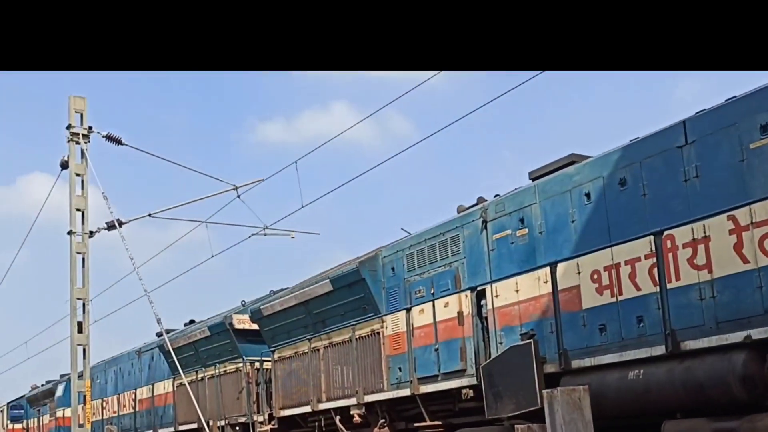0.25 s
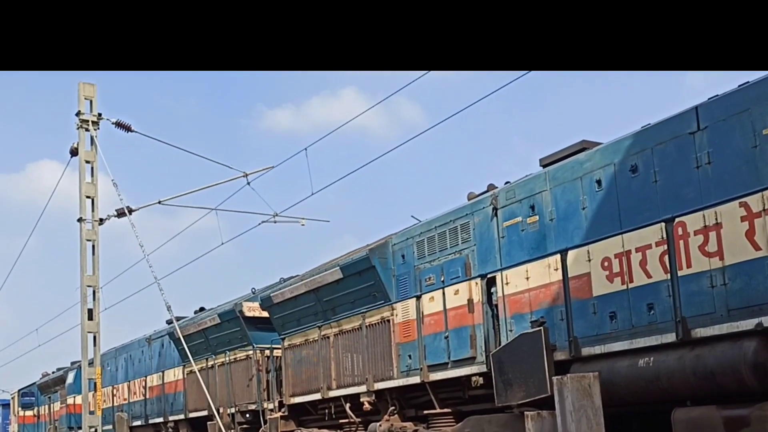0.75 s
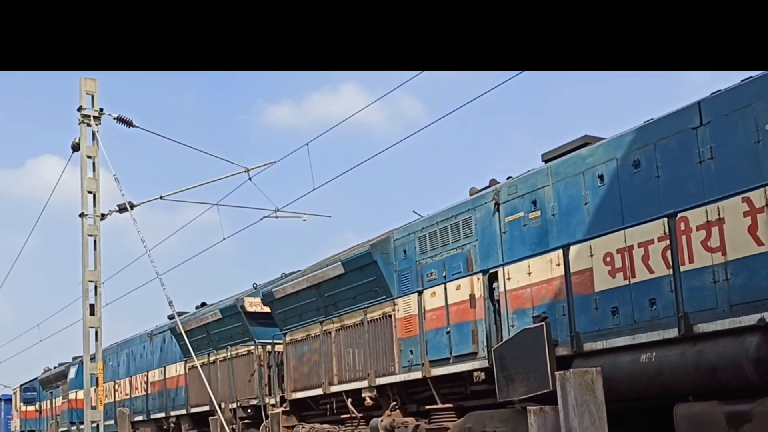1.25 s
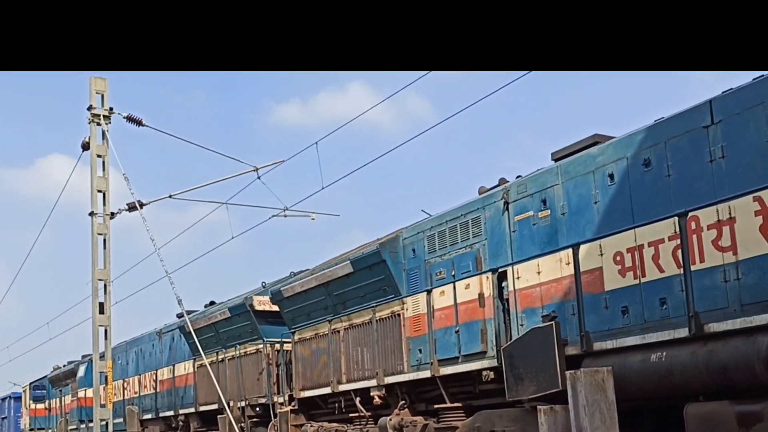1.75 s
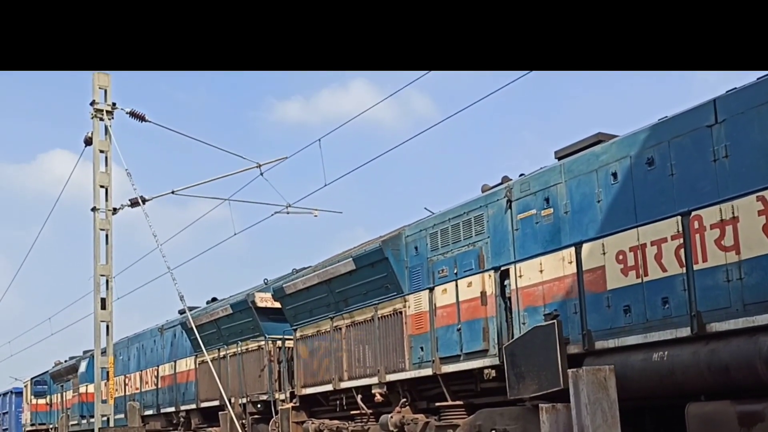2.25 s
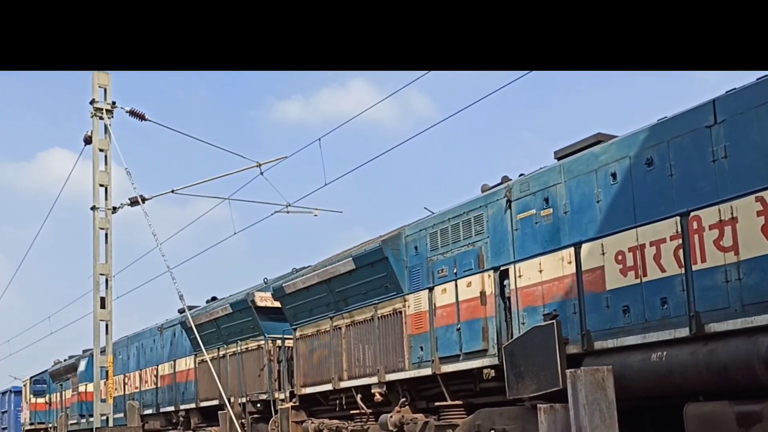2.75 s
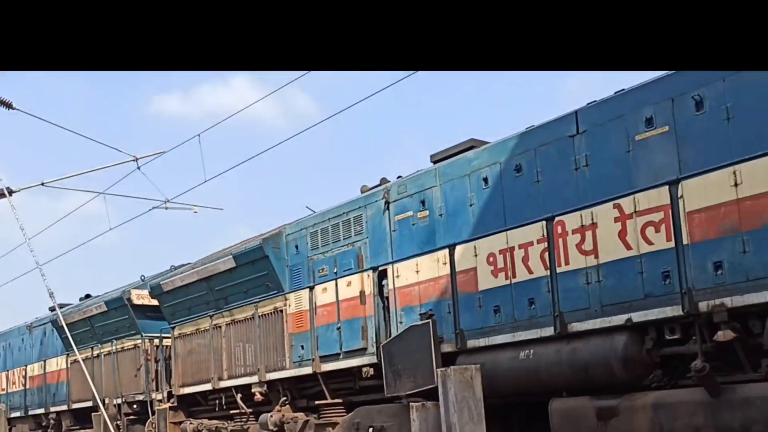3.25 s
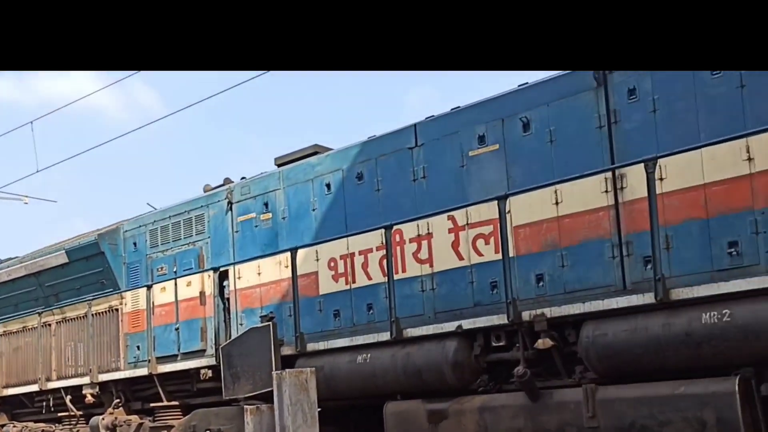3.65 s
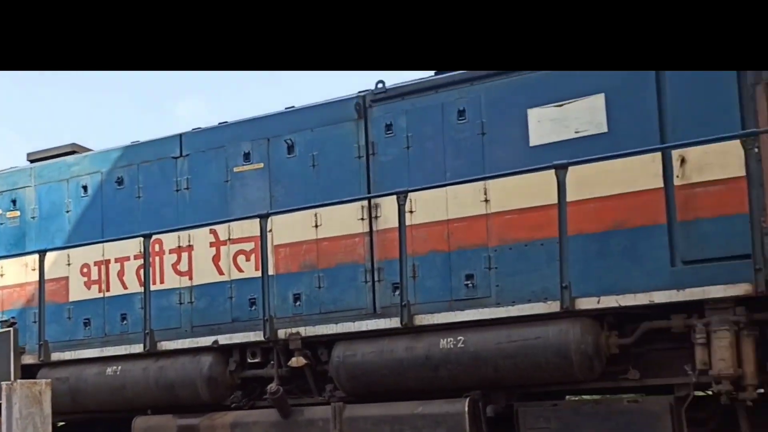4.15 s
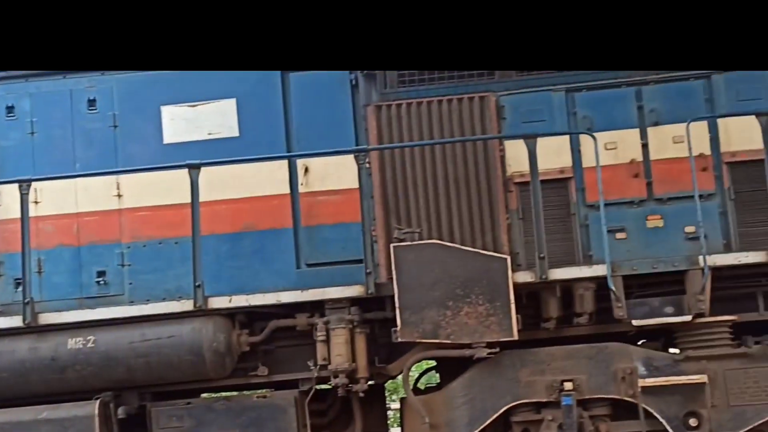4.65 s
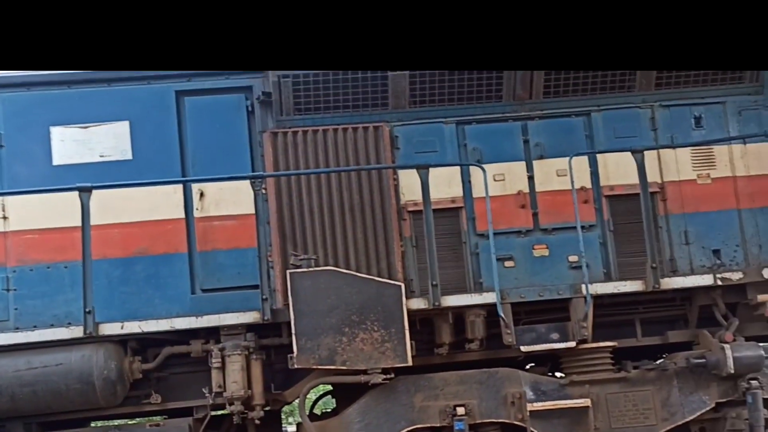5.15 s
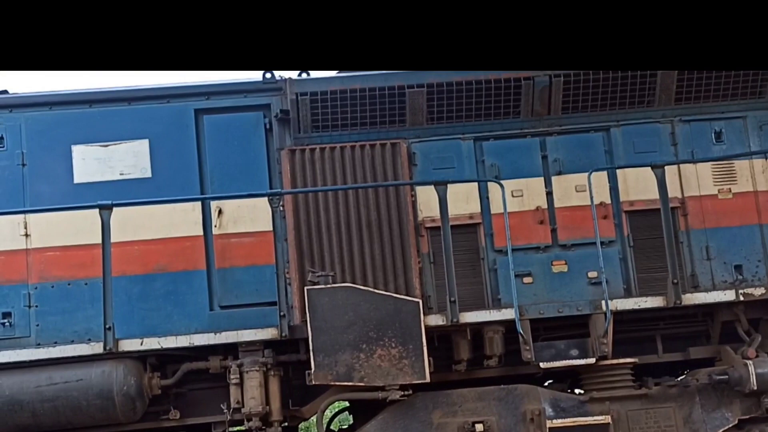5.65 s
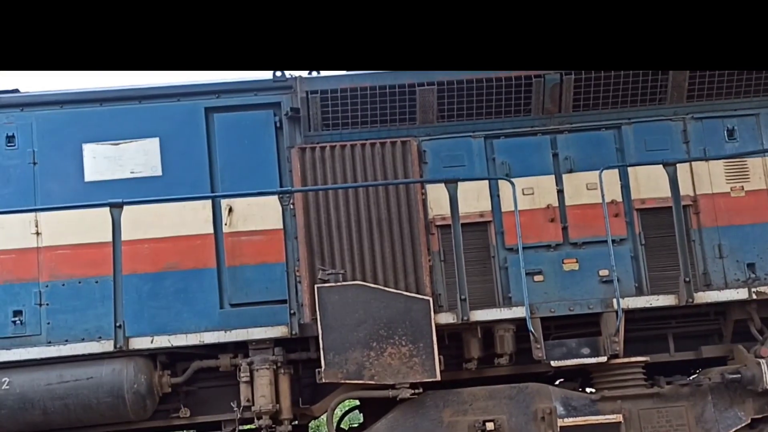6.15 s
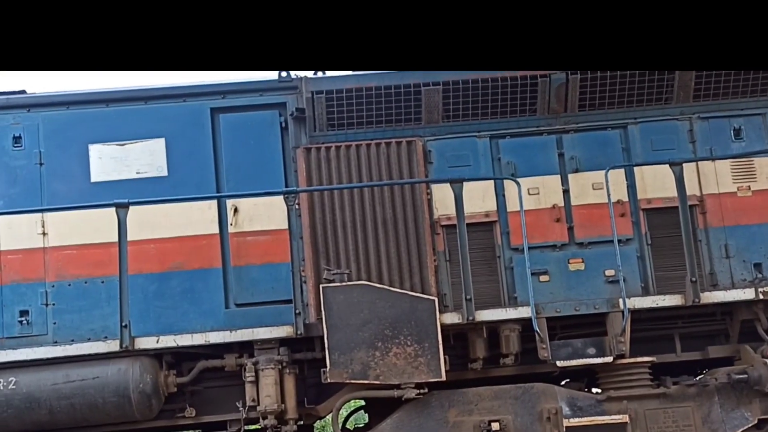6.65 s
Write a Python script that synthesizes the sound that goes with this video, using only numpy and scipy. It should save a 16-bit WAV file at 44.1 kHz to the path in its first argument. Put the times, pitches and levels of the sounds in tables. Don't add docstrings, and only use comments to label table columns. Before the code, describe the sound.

Close outdoor capture of a large idling diesel locomotive: fast, uneven low exhaust throbs, broad engine-room roar, humming casing and a thin steady turbocharger whine. After two seconds an air valve spits twice, then blasts with a hollow pipe-like whoosh, briefly ducking the engine. A sharp click follows. As the microphone turns towards the engine side, the middle tones come forward; a short hissing leak arrives near the end.

```python
import sys
import numpy as np
from scipy import signal
from scipy.fft import rfft, irfft, next_fast_len
from scipy.io import wavfile
from scipy.ndimage import uniform_filter1d, minimum_filter1d

SR = 44100
rng = np.random.default_rng(int(sys.argv[2]) if len(sys.argv) > 2 else 0)


def gain_from_decibels(decibels):
    exponent = np.asarray(decibels, float) / 20
    return 10 ** exponent


def output_pcm(signal):
    pcm = np.clip(np.atleast_2d(signal).T, -1, 1) * 32767
    wavfile.write(sys.argv[1], SR, np.round(pcm).astype(np.int16))


N = 303496
T = np.arange(N) / SR

CRANK_HZ = 4.5066
# (strength [dB], lag along the manifold [ms])
CYLINDERS = [(-40.0, -2.37), (-44.1, -3.71), (-38.0, -3.85), (-36.5, 3.93), (-34.4, -3.97), (-37.9, 3.68),
             (-36.5, -2.49), (-39.4, 4.34), (-37.9, 1.3), (-42.5, -0.2), (-40.6, -0.79), (-44.7, -3.59),
             (-41.6, 0.5), (-37.6, -1.68), (-51.3, 5.89), (-39.5, -0.82)]
# (multiple of crank speed, level [dB rms], change once the listener has turned [dB])
CASING_HUM = [(33, -38.7, 0), (40, -36.0, 0), (43, -35.2, 0), (48, -38.7, 0), (49, -35.8, 0),
              (52, -38.7, 0), (58, -38.7, 0), (60, -35.7, 0), (79, -35.9, 0), (80, -38.7, 0),
              (88, -36.1, -2), (90, -38.6, 0), (91, -39.4, 0), (92, -37.4, 0), (94, -33.6, -3),
              (96, -34.2, -11), (97, -39.5, 0), (112, -39.4, 0), (113, -37.8, 0), (146, -35.8, -6),
              (147, -40.3, 0), (156, -42.2, 4), (157, -40.7, 4), (158, -33.7, 3.5)]
FAINT_HUM = [50, 51, 54, 59, 61, 62, 71, 75, 76, 77, 78, 82, 100, 102, 114, 127, 143, 150, 155, 159, 163,
             169]
FAINT_HUM_DB = -44.5
# (frequency [Hz], density [dB per Hz])
ROAR_SPECTRUM = [(40, -34.5), (58, -23), (80, -1.5), (130, -1), (220, -0.5), (300, -2), (420, -1),
                 (700, -2.5), (850, -11.5), (1250, -17.5), (2000, -15), (2400, -18), (3200, -22),
                 (4400, -22)]
# (time [s], share turned, roar level [dB])
FACING = [(0, 0.05, -18.5), (1.5, 0.01, -19), (2.6, 0.02, -18.5), (3.3, 0.31, -19.5), (4, 0.55, -19.5),
          (4.8, 0.75, -20.5), (5.6, 0.86, -20.5), (6.3, 0.78, -20), (6.88, 1.2, -22.5)]
# (time [s], frequency [Hz], level [dB])
TURBO = [(0, 3985, -24.5), (1.2, 3985.5, -24.5), (2.3, 3987, -25.5), (3.2, 3986, -26), (3.75, 3985, -30),
         (4.4, 3984, -27.5), (5.1, 3990, -25), (6.1, 3989, -28), (6.6, 3989, -25), (6.88, 3989, -26)]
# (multiple, level [dB], blur width [Hz])
TURBO_OVERTONES = [(2, -21.5, 55), (3, -18, 70)]
# (delay [s], level [dB])
TURBO_ECHOES = [(.02, -5), (.045, -7), (.075, -9)]
# (time [s], level [dB])
LOW_GEAR = [(0, -36.5), (.5, -33.5), (1.4, -32.5), (2.5, -33), (3.7, -35), (4.5, -32.5), (4.9, -32.5),
            (5.4, -46), (5.8, -40), (6.7, -41), (6.88, -55)]
# (time [s], level [dB])
HIGH_GEAR = [(0, -52), (.44, -42), (.9, -51.5), (1.3, -51), (2.1, -53), (2.5, -41), (3.1, -39), (3.7, -49),
             (4.7, -38.5), (5.18, -46), (5.5, -40), (6.2, -56), (6.88, -46.5)]
LOOSE_HZ = [700, 995, 2117, 2162, 2188, 4980, 5110, 5437, 5884, 6799]
# (width [Hz], level [dB])
LOOSE_TONES = [(40, -38.5), (19, -46), (20, -43.5), (40, -41.5), (26, -41), (8, -57), (10, -62.5), (6, -49),
               (8, -56), (20, -53)]
# (frequency [Hz], density [dB per Hz])
JET_SPECTRUM = [(1500, -11), (2500, -2), (3500, -0.5), (4500, 0.5), (7000, -3), (10000, 3), (13000, -1.5),
                (16000, -4.5)]
# (frequency [Hz], width [Hz], level [dB])
VALVE_CAVITY = [(3000, 78, -2.5), (3600, 220, 1), (4320, 500, -12), (6590, 600, 1), (7480, 250, 1.5),
                (12200, 1000, 1.5)]
# (time [s], level [dB], sag [dB per s], open time [s])
SPITS = [
    (1.994, -33, 120, .08),
    (2.22, -31.5, 105, .09),
]
# (frequency [Hz], gain [dB])
SPIT_COLOUR = [(4000, -18), (5600, 0), (7500, -2), (9000, -4), (13000, -3)]
# (time [s], level [dB], sag [dB per s], open time [s])
PUFFS = [
    (2.64, -27, 11, 0.134),
    (2.692, -22, 300, 0.094),
    (2.776, -22, 58, 0.33),
]
# (time [s], peak level [dB], frequency [Hz], t60 [s])
TICKS = [
    (2.305, -35, 15300, .03),
    (2.36, -49, 15400, 0.024),
    (3.516, -25, 13600, .003),
    (3.5195, -31, 13500, .003),
    (5.92, -43, 13200, 0.017),
    (6.36, -44, 13100, .02),
    (6.445, -40, 13100, 0.033),
    (6.82, -43, 13500, .01),
]
# (time [s], level [dB])
PIPE_FLOW = [(2.7, -49), (2.738, -26.5), (2.79, -31), (2.9, -28), (3.0, -33), (3.07, -33.5), (3.15, -38),
             (3.3, -45)]
# (frequency [Hz], width [Hz], level [dB])
PIPE_MODES = [(1350, 22, -4), (1536, 18, -4), (1700, 25, -3), (1773, 30, 0), (1880, 36, -2), (2013, 27, -2),
              (2390, 45, -3), (2870, 140, -8), (4215, 60, -3)]
# (middle [s], length [s], frequency [Hz], level [dB])
TOOTS = [(2.76, .12, 798, -25), (2.95, .12, 800, -26), (3.08, .16, 806, -29), (2.85, .24, 977, -28),
         (3.02, .1, 975, -34), (2.77, .13, 1165, -30), (2.94, .2, 1172, -35), (2.86, .1, 1026, -36),
         (3.02, .2, 1026, -32), (3.23, .2, 1024, -35), (3.42, .22, 1030, -38)]
# (time [s], level [dB], sag [dB per s], open time [s])
LEAKS = [
    (6.3, -48, -22, 0.27),
    (6.554, -25.5, 22, .13),
    (6.69, -33, 40, .2),
    (6.742, -39, 56, 0.4),
]
# (frequency [Hz], width [Hz], level [dB])
SQUEAL_MODES = [(3000, 90, -9), (3600, 120, -7), (5600, 150, -4), (6470, 150, 0), (7500, 80, 1),
                (8300, 200, -4), (8800, 150, 0), (13100, 500, 0), (14200, 120, -2), (14600, 120, -3)]
STEP_HZ = [4720, 4790, 6070, 6140, 7560, 7660, 7730, 8470, 8580, 10300, 10900, 11480, 11640, 12800, 15720,
           15860]
STEP_DB = [0.5, -9.5, -7.5, -1, -2, 1.5, -6, -7.5, -22, -35.5, -41, -48.5, -21.5, -21.5, -22, -62.5]


def evened(x):
    return x / np.sqrt(np.mean(abs(x) ** 2) + 1e-20)


def read(points, hz):
    f, value = np.transpose(points)
    return np.interp(np.log(hz + 1), np.log(f + 1), value)


def level(rows):
    s, db = np.transpose(rows)
    return gain_from_decibels(np.interp(T, s, db, left=-120, right=-120))


def coloured(x, points):
    size = next_fast_len(N)
    gain = gain_from_decibels(read(points, np.fft.rfftfreq(size, 1 / SR)))
    return irfft(rfft(x, size) * gain, size)[:N]


def white():
    return rng.standard_normal(N)


def wobble(width_hz):
    r = np.exp(-np.pi * width_hz * 10 / SR)
    z = [1, 1j] @ rng.standard_normal((2, N // 10 + 2))
    for _ in range(2):
        z = signal.lfilter([1], [1, -r], z)
    return np.interp(np.arange(N) / 10, np.arange(len(z)), evened(z))


def tone(hz):
    turns = (np.cumsum(hz * np.ones(N)) / SR + rng.random()) % 1
    angle = (2 * np.pi * turns).astype(np.float32)
    return np.sqrt(2) * (np.cos(angle) + 1j * np.sin(angle))


def crank_swing(share, multiple=1):
    return np.cos(2 * np.pi * (multiple * CRANK_HZ * T - share))


def share_turned():
    return np.interp(T, *np.transpose(FACING)[:2])


def modes(table):
    return evened(sum(gain_from_decibels(db) * np.sqrt(w) * (tone(hz) * wobble(w)).real for hz, w, db in table))


def puffs(rows):
    open_s, shut_s = 0.011, 0.02
    gain = 0
    for s, db, sag, length in rows:
        opening = np.clip(1 + (T - s) / open_s, 0, 1) ** 2
        shutting = np.clip(1 + (s + length - T) / shut_s, 0, 1) ** 2
        gain = gain + gain_from_decibels(db - sag * np.maximum(T - s, 0)) * opening * shutting
    return gain


def exhaust():
    pulses = np.zeros(N + SR)
    turns = np.arange(int(N / SR * CRANK_HZ) + 3)
    for k, (db, lag_ms) in enumerate(CYLINDERS):
        s = (turns + k / len(CYLINDERS)) / CRANK_HZ + lag_ms / 1000
        at = np.round((s + 0.5 - 2 / CRANK_HZ) * SR).astype(int)
        pulses[at[at < len(pulses)]] += gain_from_decibels(db) * SR / (2 * CRANK_HZ)
    silencer = np.vstack([signal.butter(4, 70, "high", fs=SR, output="sos"),
                          signal.butter(4, 108, "low", fs=SR, output="sos")])
    edges = [(47, -35), (54, 5), (59, -12), (68, 0), (137, 0), (142, -25)]
    return coloured(signal.sosfilt(silencer, pulses)[SR // 2:][:N], edges)


def casing():
    turned = share_turned() - 0.25
    hum = 0
    for k, db, change in CASING_HUM + [(k, FAINT_HUM_DB, 0) for k in FAINT_HUM]:
        swell = 0.88 + 0.38 * wobble(0.32)
        hum = hum + gain_from_decibels(db + turned * change) * (tone(k * CRANK_HZ) * swell).real
    return hum


def roar():
    size, hop = 1024, 256
    frames, hz = N // hop + 5, np.fft.rfftfreq(size, 1 / SR)
    a, b, patches = rng.standard_normal((frames, size // 2 + 1, 3)).T
    patches = evened(uniform_filter1d(uniform_filter1d(patches, 14, 0), 10, 1))
    s, turned, db = np.transpose(FACING)
    t = np.arange(frames) * hop / SR

    def turning(before_db, after_db):
        return np.interp(t, s, before_db + (after_db - before_db) * turned)

    mid = read([(700, 0), (900, 1), (1500, 1), (1900, 0)], hz)[:, None]
    top = read([(1900, 0.073), (2400, 0.94), (5000, 2.0), (8000, 0.29)], hz)[:, None]
    fizz = read([(12850, 0), (12950, 1)], hz)[:, None]
    field_db = read(ROAR_SPECTRUM, hz)[:, None] + 0.93 * patches
    field_db += mid * turning(0.5, 6.5) + top * turning(-1.25, 1)
    field_db += fizz * (turning(1.5, -0.8) + 1.2 * rng.standard_normal(frames))
    noise = signal.istft((a + 1j * b) * gain_from_decibels(field_db), nperseg=size, noverlap=size - hop)[1][:N]
    return gain_from_decibels(np.interp(T, s, db)) * coloured(evened(noise), [(40, -8), (52, -14), (68, 0)])


def turbo():
    s, hz, db = np.transpose(TURBO)
    swing_hz, fastest_share = 10.5, 0.15

    def heard(delay_s):
        return np.interp(T, s, hz) + swing_hz * crank_swing(fastest_share + CRANK_HZ * delay_s)

    blades = tone(heard(0)) * (0.75 + 0.4 * wobble(17)) * (1 + 0.4 * crank_swing(0.8, 3))
    for delay_s, echo_db in TURBO_ECHOES:
        blades = blades + gain_from_decibels(echo_db) * tone(heard(delay_s)) * wobble(1.57)
    blades = blades / np.sqrt(uniform_filter1d(abs(blades) ** 2, size=13000) / 2)
    overtones = sum(gain_from_decibels(-16.5 + over_db) * tone(k * heard(0)) * (0.3 + wobble(w))
                    for k, over_db, w in TURBO_OVERTONES)
    skirt = tone(heard(0)) * wobble(100)
    return (gain_from_decibels(np.interp(T, s, db) + 0.55) * blades + gain_from_decibels(-31.0) * skirt + overtones).real


def gear(rows, hz, swing_hz, fastest_share, depth_db, crest_share, blur):
    s, db = np.transpose(rows)
    pitch = hz + swing_hz * crank_swing(fastest_share)
    swell = gain_from_decibels(depth_db * (np.tanh(2 * crank_swing(crest_share)) - 0.53))
    return gain_from_decibels(np.interp(T, s, db) + 3.0) * (tone(pitch) * swell * (1 + blur * wobble(11))).real


def gears():
    low = gear(LOW_GEAR, 2558.9, 10.5, 0.96, 4.8, 0.45, 0.28)
    high = gear(HIGH_GEAR, 4326, 6, 0.95, 6.5, 0.84, 0.5)
    loose = sum(gain_from_decibels(db) * (tone(hz) * wobble(w)).real for hz, (w, db) in zip(LOOSE_HZ, LOOSE_TONES))
    side = gain_from_decibels(-35.5) * tone(705) * wobble(40) + gain_from_decibels(-52) * tone(5625) * wobble(9)
    side = side + gain_from_decibels(-44) * tone(2562) * (0.7 + 0.5 * wobble(14))
    throb = 1 + 0.8 * crank_swing(0.87)
    rattle = throb * sum(tone(hz) * wobble(18) for hz in (4345, 4370)).real
    return low + high + gain_from_decibels(-46.5) * rattle + loose + share_turned() * side.real


def valve_jet(sputter):
    jet = evened(coloured(white(), JET_SPECTRUM)) + 0.5 * modes(VALVE_CAVITY)
    return sputter * gain_from_decibels(9.0) * (jet * puffs(PUFFS) + coloured(jet, SPIT_COLOUR) * puffs(SPITS))


def ticks():
    out, t = np.zeros(N), np.arange(1500) / SR
    for s, db, hz, t60 in TICKS:
        attack = np.minimum(t / (t60 / 10), 1)
        out[round(s * SR):][:len(t)] += gain_from_decibels(db + 25 - 60 * t / t60) * np.sin(2 * np.pi * hz * t) * attack
    return out


def drain_pipe(sputter):
    rush_spectrum = [(700, -20), (900, -8), (1800, 8), (3000, 1.5), (4600, 0.5), (6000, -19)]
    rush = evened(coloured(white(), rush_spectrum))
    toots = sum(gain_from_decibels(db) * np.exp(-8 * ((T - s) / length) ** 2) * tone(hz) for s, length, hz, db in TOOTS)
    toots = (toots * (1.0 + 0.55 * wobble(60))).real
    return level(PIPE_FLOW) * (gain_from_decibels(3.0) * modes(PIPE_MODES) + gain_from_decibels(2.5) * sputter * rush) + toots


def leak():
    hiss = evened(coloured(white(), JET_SPECTRUM))
    return gain_from_decibels(-2.0) * puffs(LEAKS) * (gain_from_decibels(3) * hiss + gain_from_decibels(1) * modes(SQUEAL_MODES))


def air():
    sputter = gain_from_decibels(1.8 * wobble(130).real)
    return valve_jet(sputter) + drain_pipe(sputter) + leak()


def scene():
    middle_s, width_s, depth_db = 2.827, 0.09, -7.5
    duck = gain_from_decibels(depth_db * np.exp(-((T - middle_s) / width_s) ** 2))
    machinery = duck ** 1.5 * exhaust() + duck * (gain_from_decibels(0.2) * casing() + roar() + gears())
    return (machinery + duck ** 0.99 * turbo() + air() + ticks())[None]


def limited(x):
    ceiling, window = 0.72, 201
    gain = np.minimum(ceiling / (abs(x) + 1e-9), 1)
    return x * uniform_filter1d(minimum_filter1d(gain, size=window), size=window)


def top_cut(x):
    return signal.sosfilt(signal.butter(12, 15910, fs=SR, output="sos"), x)


def record(dry):
    stepped = coloured(dry[0], list(zip(STEP_HZ, STEP_DB)))
    return top_cut(limited(stepped)[None])


dry = scene()
out = record(dry)
output_pcm(out)
```